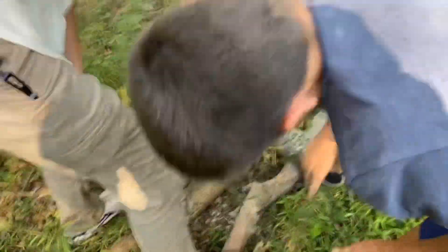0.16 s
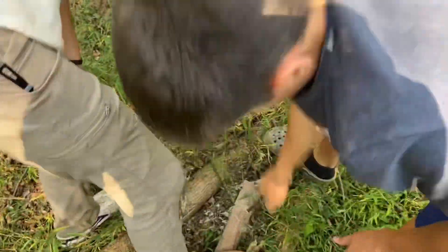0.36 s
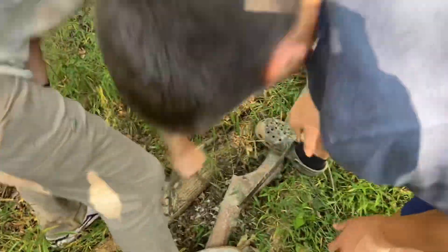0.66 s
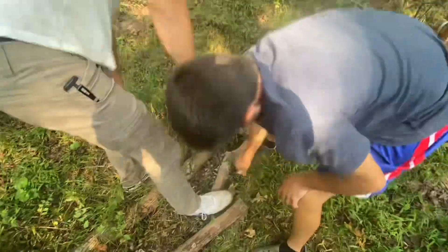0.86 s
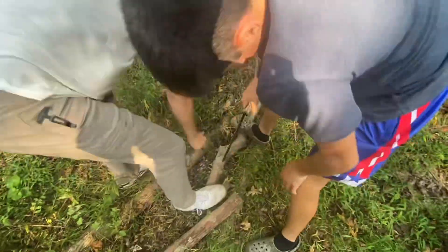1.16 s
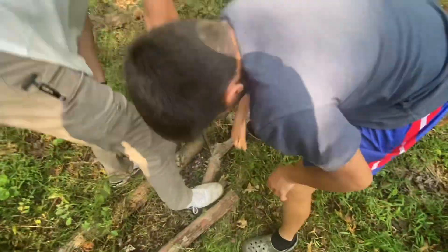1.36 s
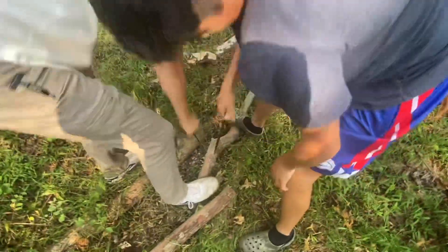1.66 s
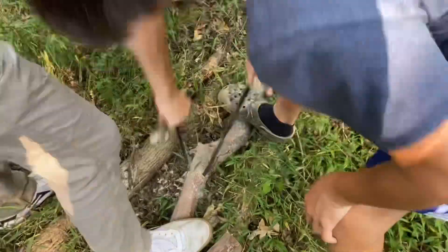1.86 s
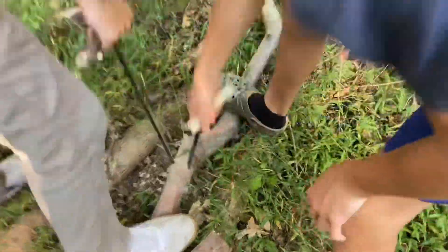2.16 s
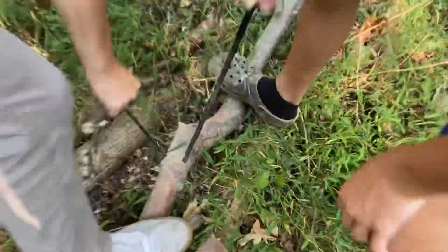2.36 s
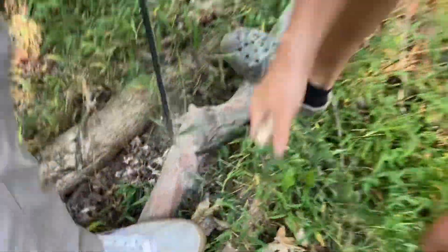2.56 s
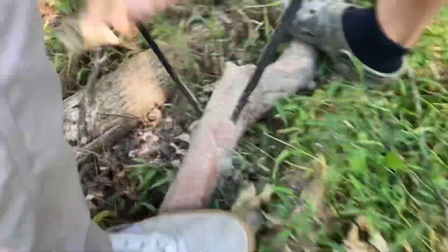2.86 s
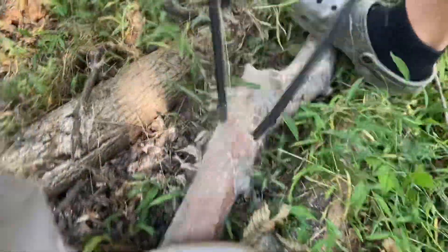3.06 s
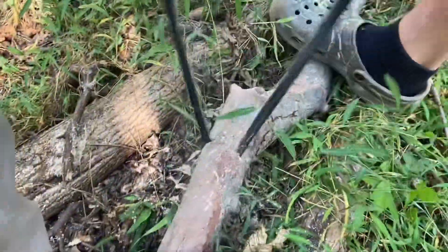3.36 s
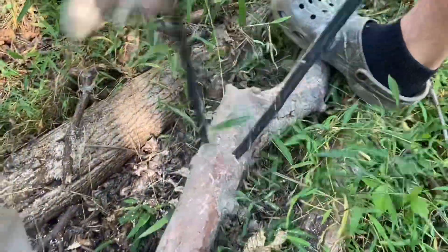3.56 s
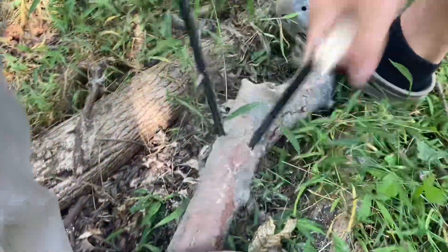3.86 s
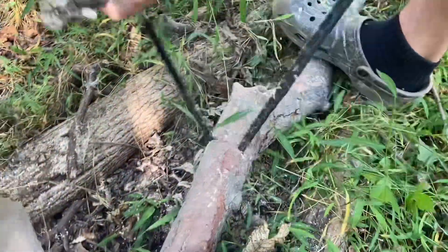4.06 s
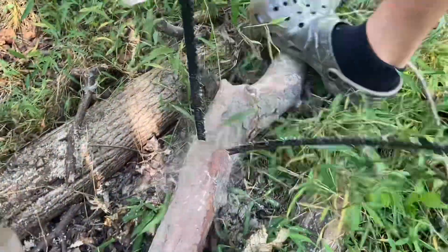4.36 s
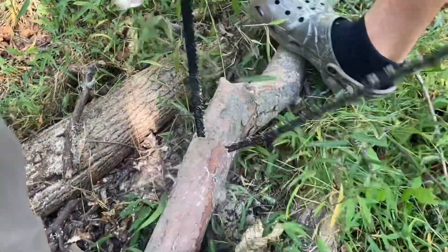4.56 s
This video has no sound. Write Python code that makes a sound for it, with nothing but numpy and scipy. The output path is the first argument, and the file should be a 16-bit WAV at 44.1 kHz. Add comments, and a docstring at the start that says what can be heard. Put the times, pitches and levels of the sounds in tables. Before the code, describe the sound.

Outdoors, with soft still air and a thin high insect shimmer, a hand chain saw is already rasping through a log. Fourteen short strokes follow one another about every 0.3 seconds, alternating in character: one hand's pull rises in pitch, the other sags and squeaks slightly as the cutters tear fibres. Until about 1.9 seconds the sawing is moderate and a bit distant; a faint far trill of tiny chirps runs from 0.9 to 1.7. Between 1.9 and 2.4 the microphone moves close, and the rasp grows louder and coarser, with metallic link rattle, low log rocking and sharp snaps, notably near 3.0, 3.4 and 3.8. The last pull ends around 4.1 with a hard, splintery double crack. At 4.33 the log knocks down with a hollow, quickly damped clunk and soft thump, loose links slither briefly, tiny bounces fade, and only faint insects and air remain until 4.7.

```python
"""Hand chain saw in a log

On grassy ground a hand chain saw is pulled to and fro through a log while the microphones move closer.
Each pull shapes noise and tooth impulses into rasp, tearing fibres, rattling links and a rocking log.
At last the saw snags with a crack of noise bursts, and the log knocks down in decaying modes and thumps.
Filtered noise and brief rings make air and insects in the trees; a thin trill of chirps passes far away."""
import sys
import numpy as np
from scipy import signal
from scipy.fft import rfft, irfft
from scipy.io import wavfile
from scipy.ndimage import uniform_filter1d

SR = 44100
rng = np.random.default_rng(int(sys.argv[2]) if len(sys.argv) > 2 else 0)


def int16_out(signal):
    """Quantize to a 16-bit WAV file."""
    q = np.round(np.clip(np.atleast_2d(signal).T, -1, 1) * 32767)
    wavfile.write(sys.argv[1], SR, q.astype(np.int16))


N = 207402
T = np.arange(N) / SR

# Pulls on the saw, by the two hands in turn. Each row: start in seconds, length in seconds, attack in
# seconds, crest as share of the length, arch from crest to ends in dB before each layer's share of it,
# then levels in dB before the layer trims: rocking of the log, bite of the teeth, tearing fibres,
# rattle of the links; last the ring of the log at mid pull in Hz.
PULLS = [(0.04, 0.25, 0.098, 0.61, 17.5, -49, -28.5, -40.5, -47.5, 800),
         (0.342, 0.25, 0.1, 0.42, 1, -51.5, -31.0, -44, -49, 557),
         (0.642, 0.23, 0.027, 0.66, 17.0, -52.5, -24.5, -38.5, -49.5, 820),
         (0.912, 0.29, 0.018, 0.55, 12.5, -54.5, -32, -40.5, -48, 547),
         (1.219, 0.269, 0.035, 0.53, 12, -47, -31.5, -46, -48.5, 807),
         (1.501, 0.28, 0.072, 0.62, 5, -54.5, -32, -43, -46.5, 616),
         (1.804, 0.27, 0.041, 0.51, 10, -53.5, -30, -41.0, -47.5, 840),
         (2.092, 0.29, 0.026, 0.46, 13.5, -49.5, -28.0, -40, -44, 566),
         (2.391, 0.27, 0.041, 0.53, 11, -43, -27.0, -39.5, -41.5, 660),
         (2.608, 0.336, 0.14, 0.71, 11.5, -46, -23.5, -34.5, -39.5, 528.7),
         (2.939, 0.293, 0.053, 0.55, 15, -38, -23.5, -37, -41, 630),
         (3.208, 0.32, 0.085, 0.4, 20, -40.5, -22.5, -31.5, -40, 520),
         (3.51, 0.28, 0.055, 0.61, 11, -35, -21, -34.5, -38, 603),
         (3.798, 0.3, 0.044, 0.46, 25.5, -37.5, -22.5, -31.5, -39.5, 520)]
# Colour of the wood from close by. Each row: frequency in Hz, relative level in dB.
WOOD_NEAR = [(90, -37.5), (170, -2.5), (250, -5), (320, -5.5), (440, 1.5), (560, 1.5), (680, -0.5),
             (850, -1), (1060, 0), (1270, -3.5), (1700, -10), (2200, -11), (3000, -24.5), (5000, -38)]
# Colour of cracking wood and of links on bark. Each row: frequency in Hz, relative level in dB.
CRACK = [(100, -40), (500, 8), (1200, 4.5), (2000, 4.5), (3200, 2.5), (4500, 0), (6000, 0), (7500, 5),
         (10000, 1.5), (15000, 0), (17000, 10.5)]


def amp(db):
    """Decibels to gain."""
    return 10 ** (np.asarray(db) / 20)


def evened(x):
    """Scales to rms 1."""
    return x / np.sqrt(np.mean(x ** 2) + 1e-20)


def read(points, hz):
    """Reads a spectrum table on a log-frequency axis."""
    f, value = np.transpose(points)
    return np.interp(np.log(hz + 1), np.log(f), value)


def level(rows):
    """Gain over time from a curve of seconds and dB."""
    s, db = np.transpose(rows)
    return amp(np.interp(T, s, db))


def add(mix, s, sound):
    """Adds a sound to the mix at time s, in place."""
    part = mix[round(s * SR):][:len(sound)]
    part += sound[:len(part)]


def colour(x, spectrum, peaks=(), size=4096):
    """Minimum-phase filter from a spectrum with resonances on top; keeps the power of white noise."""
    hz = np.fft.rfftfreq(size, 1 / SR)
    lift = sum(db / (1 + (2 * (hz - f) / width) ** 2) for f, width, db in peaks)
    gain = evened(amp(read(spectrum, hz) + lift))
    log_gain = np.log(np.r_[gain, gain[-2:0:-1]])
    taps = np.fft.ifft(np.exp(np.conj(signal.hilbert(log_gain)))).real[:size // 2]
    return signal.oaconvolve(x, taps)[:len(x)]


def grit(per_s, spread_db):
    """Tiny fractures of uneven size and random sign at random moments."""
    size = amp(spread_db * np.minimum(rng.exponential(1, N), 4))
    struck = rng.random(N) < per_s / SR
    return evened(size * rng.choice([-1, 1], N) * struck)


def pings(low_hz, high_hz, ring_s, per_s, spread_db, count=14):
    """Many brief rings at scattered pitches, each pitch with its own sparse train of taps."""
    t = T[:SR // 30]
    rings = [np.exp(-t / ring_s) * np.sin(2 * np.pi * hz * t) for hz in rng.uniform(low_hz, high_hz, count)]
    return evened(sum(signal.oaconvolve(grit(per_s / count, spread_db), ring)[:N] for ring in rings))


def steadied(x, span_s):
    """Holds the slow level at 1 and leaves the fast grain."""
    power = uniform_filter1d(x ** 2, int(span_s * SR))
    power = uniform_filter1d(power, int(span_s * SR / 2))
    return x / np.sqrt(np.abs(power) + 1e-6)


def resonate(x, hz, width_hz):
    """A resonance of gain 1 that follows the curve hz: shift to zero frequency, smooth, shift back."""
    turn = np.exp(2j * np.pi * np.cumsum(hz * np.ones(N)) / SR)
    r = np.exp(-np.pi * width_hz / SR)
    return 2 * (turn * signal.lfilter([1 - r], [1, -r], x / turn)).real


def outdoors(air_db=-54, apart=0.79, insects_apart=2.5):
    """Still air and a wide, shimmering insect chorus: noise partly shared between the two channels."""
    # Colour of the air. Each row: frequency in Hz, relative level in dB.
    air_colour = [(20, 5), (50, 5.5), (120, 3), (250, 2.5), (500, -9), (900, -11.5), (1600, -26),
                  (3000, -18), (5000, -14.5), (8000, -35), (12000, -35), (16000, -35)]
    # Colour of the insects. Each row: frequency in Hz, relative level in dB.
    insect_colour = [(4500, -44), (5650, -7.5), (6050, 3.5), (6350, 7.5), (6650, 1), (7100, -1.5),
                     (8000, -40), (10000, -21)]
    # Swell of the chorus. Each row: time in seconds, level in dB.
    chorus_curve = [(0, -49.5), (.7, -47), (1.1, -44), (1.6, -44.5), (2.1, -47.5), (3, -49.5), (4.7, -49.5)]
    shared, *own = rng.standard_normal((3, N))
    air = np.array([colour(evened(shared + apart * z), air_colour) for z in own])
    shared, *own = rng.standard_normal((3, N))
    shimmer = pings(6100, 6750, ring_s=0.0081, per_s=250, spread_db=4.0)
    song = [colour(evened(shared + insects_apart * z), insect_colour) for z in own]
    insects = np.array([evened(side + 0.45 * shimmer) for side in song])
    return amp(air_db) * air + level(chorus_curve) * insects


def nearness(approach_s=1.87, approach_length_s=0.53):
    """0 while the microphones are far from the log, 1 once they are close."""
    return np.clip((T - approach_s) / approach_length_s, 0, 1)


def pull_state():
    """How far each pull has run (0-1), which hand pulls (0 or 1), the log's ring in Hz, and the crest."""
    # Glide of the ring over a pull, in octaves: it rises under the first hand and sags under the second.
    glide_octaves = (0.19, -0.39)
    rows = np.array(PULLS)
    which = np.maximum(np.searchsorted(rows[:, 0], T) - 1, 0)
    run = np.clip((T - rows[which, 0]) / rows[which, 1], 0, 1)
    hand = which % 2
    ring_hz = rows[which, -1] * 2 ** (np.take(glide_octaves, hand) * (run - .5))
    return uniform_filter1d(np.array([run, hand, ring_hz, rows[which, 3]]), SR // 50)


def effort(law, axis):
    """Gain of one layer: each pull takes hold, arches over its crest and lets go; the chain idles at the turns."""
    release_s, shift, arch_share, far_db, near_db = law
    power = amp(far_db + (near_db - far_db) * nearness()) ** 2
    for row in PULLS:
        start, length, attack_s, crest, arch_db, *_ = row
        t = T[T < length]
        # a release of 0 s lets go at once
        with np.errstate(divide="ignore"):
            release = np.minimum(np.divide(length - t, release_s), 1) ** 1.42
        grip = np.minimum(t / attack_s, 1) * release
        arch = arch_share * arch_db * (2 * (t / length - crest - shift)) ** 2
        add(power, start, (grip * amp(row[axis] - arch)) ** 2)
    return np.sqrt(power)


def teeth(per_s=110, jitter=.3):
    """One equal impulse for each cutter entering the wood; the chain is fastest in mid pull."""
    speed = np.sqrt(np.sin(np.pi * pull_state()[0]).clip(0))
    travel = np.cumsum(speed) * per_s / SR  # in cutters
    slip = rng.standard_normal(1000)
    at = np.searchsorted(travel, np.arange(len(slip)) + jitter * slip)
    return np.bincount(at, minlength=N + 1)[:N].astype(float)


def tearing(bites, decay_s, drag):
    """Each bite loads the wood and lets go, over a steady drag."""
    load = signal.lfilter([1], [1, -np.exp(-1 / (decay_s * SR))], bites)
    return evened(abs(drag) + evened(load))


def log_rocking(bites, tip_db=3.0):
    """Bites and grit shake the log on the ground; the rumble swells twice in each pull."""
    # Colour of the rocking. Each row: frequency in Hz, relative level in dB.
    rocking_colour = [(20, -46), (45, 2.5), (70, -1.5), (105, 3.5), (160, -3.5), (240, -6.5), (400, -34),
                      (900, -75)]
    shake = evened(bites) + grit(per_s=3700, spread_db=0.5)
    rocking = steadied(colour(shake, rocking_colour), span_s=0.03)
    # the log tips as the chain takes hold and drops back as it lets go
    return rocking * amp(-tip_db * np.cos(4 * np.pi * pull_state()[0]))


def wood_rasp(bites, darken_db=8, swell_db=3):
    """Bites and fractures sound through the log, which dulls and rings more strongly as a pull runs out."""
    # Colour of the wood from farther off. Each row: frequency in Hz, relative level in dB.
    wood_far = [(90, -39), (170, -10.5), (260, 0.5), (340, -6), (440, 0), (560, -1.5), (680, -3),
                (850, 0.5), (1060, 0), (1270, -2.5), (1700, -7), (2300, -13.5), (3000, -17), (5000, -32)]
    # Resonances of the log under the chain. Each row: frequency in Hz, width in Hz, lift in dB.
    cut_peaks = [(235, 25, 2), (1027, 114, 4), (1704, 24, 11), (1993, 36, 7)]
    force = tearing(bites, decay_s=0.0096, drag=0.91) * grit(per_s=5000, spread_db=1.5)
    force = force + .5 * evened(bites)
    near = nearness()
    run, _, ring_hz, _ = pull_state()
    wood = (1 - near) * colour(force, wood_far, cut_peaks) + near * colour(force, WOOD_NEAR, cut_peaks)
    ring = amp(3.5 + swell_db * (run - 2.0)) * resonate(wood, ring_hz, width_hz=70)
    overtone = amp(-21.0) * resonate(wood, 2 * ring_hz, width_hz=28)
    wood = wood + ring + overtone
    low = signal.lfilter(*signal.butter(1, 900, fs=SR), wood)
    return steadied(low + amp(-darken_db * run) * (wood - low), span_s=0.033)


def fibre_hiss(bites, squeak_lead=0.094, squeak_span=0.17):
    """Fibres tear; under the second hand the cutters run edge first and squeak just before the crest."""
    # Colour of tearing fibres. Each row: frequency in Hz, relative level in dB.
    fibre_colour = [(600, -17.5), (1500, 5), (2400, 6), (2900, -1), (3300, 0), (4100, 1), (4900, -2),
                    (5800, -10), (7200, -5), (9000, -20), (14000, -45)]
    run, hand, _, crest = pull_state()
    hiss = colour(tearing(bites, decay_s=0.007, drag=1.0) * grit(per_s=4000, spread_db=4), fibre_colour)
    squeaks = amp(-3.5) * pings(4300, 5170, ring_s=0.0028, per_s=840, spread_db=7.0, count=30)
    edge = squeaks + amp(7.0) * resonate(hiss, 4850, width_hz=750)
    # lead and span are shares of the pull
    edge_first = hand * np.exp(-((run - crest + squeak_lead) / squeak_span) ** 2)
    return steadied(hiss + edge_first * edge, span_s=0.033)


def link_rattle(bites):
    """Steel links scrape through the cut and tinkle against their rivets."""
    # Colour of scraping links. Each row: frequency in Hz, relative level in dB.
    link_colour = [(1500, -53), (4000, -7.5), (6000, -5.5), (7400, 9.5), (8500, 0), (10500, 2.5),
                   (12000, -1), (13500, 1), (15500, 3.5), (16500, -14)]
    scrape = colour(tearing(bites, decay_s=0.006, drag=2.3) * grit(per_s=5900, spread_db=-0.5), link_colour)
    tinkle = pings(6750, 15400, ring_s=0.0042, per_s=500, spread_db=4.0, count=24)
    return steadied(scrape + amp(-6.5) * tinkle, span_s=0.057)


def sawing(stop_s=0.15):
    """Cutters bite, fibres tear, links rattle and the log rocks; all fades out after the last pull."""
    # How each layer follows a pull. Each holds: release in seconds, crest shift as share of the length,
    # share of the arch, idle level far off in dB, idle level close by in dB, both before the trim below.
    rock_law = (0, 0.02, 0.63, -66, -58)
    bite_law = (0.1022, 0, 1, -54, -66)
    fibre_law = (0.12, -0.0946, 0.56, -64, -53)
    link_law = (0.16, -0.1, -0.03, -63, -54.5)
    bites = teeth()
    # axis is the layer's level column in PULLS
    rocking = amp(0.5) * effort(rock_law, axis=5) * log_rocking(bites)
    rasp = amp(-0.5) * effort(bite_law, axis=6) * wood_rasp(bites)
    hiss = amp(-1.0) * effort(fibre_law, axis=7) * fibre_hiss(bites)
    rattle = amp(0.63) * effort(link_law, axis=8) * link_rattle(bites)
    start, length, *_ = PULLS[-1]
    moving = np.clip(1 - (T - start - length) / stop_s, 0, 1)
    return moving * (rocking + rasp + hiss + rattle)


def log_ring(crush_s=0.0094):
    """The modes of the log after one blow, with a short crush of bark; peak 1."""
    # Modes of the struck log. Each row: nominal frequency in Hz, level in dB, 60 dB decay in seconds.
    log_modes = [(144, -0.5, 0.044), (238.6, -1.5, 0.13), (337, -6.5, .09), (403, 0.5, 0.071),
                 (563, -1, 0.09), (598, 1, 0.077), (840, -5.5, 0.038), (998.8, -15, 0.052),
                 (1356, -7, 0.064), (1586, 6, .025), (1919, 1, 0.046), (2245, 6, 0.037)]
    t = T[:SR // 3]
    ring = np.zeros(len(t))
    for hz, db, t60 in log_modes:
        wave = np.sin(2 * np.pi * hz * rng.uniform(.97, 1.03) * t)
        ring += rng.choice([-1, 1]) * amp(db - 60 * t / t60) * wave
    ring += colour(rng.standard_normal(len(t)) * np.exp(-t / crush_s), WOOD_NEAR)
    return ring / abs(ring).max()


def snaps(crack_s=0.0013, splinter_s=0.0094, splinter_db=-17, catch_s=0.0019, catch_db=-7):
    """A tooth catches and an instant later breaks free: a hard click, short splintering and a log ring."""
    # Teeth snapping free. Each row: time in seconds, level in dB before the trims,
    # ring of the log in dB relative to that level.
    snap_rows = [(0.051, -40, 0), (.141, -27, -7), (.598, -40.5, 1), (1.308, -34, -30), (1.486, -36, -10),
                 (2.081, -24.5, -16), (2.118, -26.5, -8), (2.43, -20, -22), (2.444, -18.5, -25),
                 (2.598, -21.5, -29), (2.774, -13.5, -19), (2.984, -4, -36), (3.249, -21, -11),
                 (3.369, -11.5, -17), (3.438, -16.5, -25), (3.8373, -11.5, -7), (3.959, -25, 5),
                 (4.132, -5, -11.5), (4.1441, -5.5, -16), (4.1533, -19, -31), (4.1655, -29, -30),
                 (4.185, -25, -22), (4.195, -19, -13), (4.402, -29.5, -28), (4.6394, -29, -40)]
    cracks, rings, t = np.zeros(N), np.zeros(N), T[:SR // 15]
    fade = np.exp(-t / crack_s) + amp(splinter_db) * np.exp(-t / splinter_s)
    for s, db, ring_db in snap_rows:
        for at, click_db in (s - catch_s, db + catch_db), (s, db):
            burst = rng.standard_normal(len(t)) * fade
            burst = burst / np.linalg.norm(burst) * 3.6 + 1.2 * (t == 0)  # noise plus one hard click
            add(cracks, at, amp(click_db) * burst)
        add(rings, s, amp(db + ring_db) * log_ring())
    return amp(2.5) * colour(cracks, CRACK) + amp(0.5) * rings


def knocks(thump_s=0.011, rise_s=0.002):
    """The log strikes and bounces in low-passed rings; the soil answers with short sine thumps."""
    # The log knocking. Each row: time in seconds, peak in dB, treble corner in Hz (lower is duller).
    knock_rows = [(0.688, -33, 2500), (2.411, -33, 2470), (2.957, -35, 2573), (3.574, -26.5, 2500),
                  (3.736, -23, 600), (3.753, -21.5, 703), (4.3309, -11.5, 3200), (4.334, -10.5, 985),
                  (4.345, -11, 600), (4.363, -15.5, 450), (4.41, -30, 794), (4.455, -33.5, 1210),
                  (4.504, -32.5, 900)]
    # The log thumping the soil. Each row: time in seconds, level in dB, frequency in Hz.
    thump_rows = [(2.568, -32, 155), (3.17, -27, 114.4), (3.729, -30, 103), (4.133, -29, 124),
                  (4.259, -27, 123), (4.341, -25.5, 162), (4.361, -20.5, 335), (4.426, -38, 89)]
    out, t = np.zeros(N), T[:SR // 5]
    for s, db, corner_hz in knock_rows:
        ring = signal.lfilter(*signal.butter(2, corner_hz, fs=SR), log_ring())
        add(out, s, amp(db) * ring / abs(ring).max())
    swell = (1 - np.exp(-t / rise_s)) * np.exp(-t / thump_s)
    for s, db, hz in thump_rows:
        add(out, s, amp(db) * swell / swell.max() * np.sin(2 * np.pi * hz * t))
    return out


def trill(start_s=.863, gap_s=.0843, top_hz=7150, bend_hz=230, half_s=0.011, db=-45, count=11):
    """A far trill of small chirps, each rising to its top pitch and falling back."""
    out, t = np.zeros(N), T[:SR // 25] - 1 / 50  # t is 0 at the middle of a chirp
    hz = top_hz - bend_hz * (t / half_s) ** 2
    chirp = np.exp(-(t / half_s) ** 2) * np.sin(2 * np.pi * np.cumsum(hz) / SR)
    for k in range(count):
        add(out, start_s + k * gap_s + t[0], amp(db) * chirp)
    return out


def slack_chain():
    """After the last pull, loose links slither over the bark: swells of coloured grit."""
    # The slithers. Each row: crest in seconds, level in dB, rise in seconds, decay in seconds.
    slither_rows = [(4.13, -30, 0.012, 0.021), (4.335, -31.5, 0.022, 0.031), (4.45, -48, 0.51, 0.38)]
    start, length, *_ = PULLS[-1]
    loose = np.zeros(N)
    for s, db, rise_s, decay_s in slither_rows:
        loose += amp(db) * np.exp(np.minimum((T - s) / rise_s, (s - T) / decay_s))
    return (T > start + length) * loose * colour(grit(per_s=7000, spread_db=0.5), CRACK)


def surroundings(x, near_s=0.0033, far_s=0.09, far_db=-33, count=7, poses_per_s=8):
    """Quick scatter off legs and ground that changes as the bodies move, and a faint return from the trees."""
    # Colour of the scatter. Each row: frequency in Hz, level in dB.
    scatter_colour = [(60, -14), (300, -6), (1000, -2), (2000, 0), (3200, -0.5), (6000, 4.5), (8500, -35),
                      (16000, -8)]
    t, out = T[:SR // 3], np.array([x, x])
    fade = (np.exp(-t / near_s) + amp(far_db) * np.exp(-t / far_s)) * (t > .0006)
    # colour() keeps the power of white noise, so the scatter level comes back here
    shade = np.sqrt(np.mean(amp(read(scatter_colour, np.linspace(0, SR / 2, SR // 20))) ** 2))
    for k in range(count):
        away = (T * poses_per_s - k + count / 2) % count - count / 2
        part = x * np.cos(np.pi / 2 * np.clip(away, -1, 1))  # each pose fades into the next, in a cycle
        for side in out:
            taps = rng.standard_normal(len(t)) * fade
            taps = colour(taps / np.linalg.norm(taps), scatter_colour)
            side += shade * signal.oaconvolve(part, taps)[:N]
    return out


def scene():
    """The saw and the log in front of the microphones, the insects and the trill around."""
    # Where the log lies in front of the microphones. Each row: time in seconds, left minus right in dB.
    place_curve = [(0, -0.2), (2.2, 1.2), (3.2, 0.5), (4.7, 0.5)]
    lean = np.sqrt(level(place_curve))
    work = surroundings(sawing() + snaps() + knocks() + slack_chain())
    return work * np.array([lean, 1 / lean]) + outdoors() + trill()


def record(dry, edge_hz=15950):
    """Two spaced microphone ports as level and phase differences, a bass cut, then the band limit."""
    # Right microphone against the left. Each row: frequency in Hz, phase lead in radians.
    port_phase = [(0, 0), (780, -.2), (3700, -.1), (5200, .6), (7100, .1), (9100, 3.14), (11100, 6.28),
                  (13200, 9.42), (15300, 12.57), (16500, 13)]
    # Balance of the microphones. Each row: frequency in Hz, left minus right in dB.
    balance = [(100, -1.2), (500, 0), (800, 0.5), (1300, 2), (2500, 2.5), (4500, -0.5), (9000, -1)]
    hz = np.fft.rfftfreq(2 * N, 1 / SR)
    lean = amp(read(balance, hz) / 2) * np.exp(-.5j * np.interp(hz, *np.transpose(port_phase)))
    pair = irfft(rfft(dry, 2 * N) * np.array([lean, 1 / lean]))[:, :N]
    wind_filter = signal.butter(4, 34, "highpass", fs=SR, output="sos")
    pair = signal.sosfilt(wind_filter, pair)
    band_limit = signal.firwin(511, edge_hz, window=("kaiser", 9), fs=SR)
    return signal.oaconvolve(pair, band_limit[None], "same")


dry = scene()
out = record(dry)
int16_out(out)
```